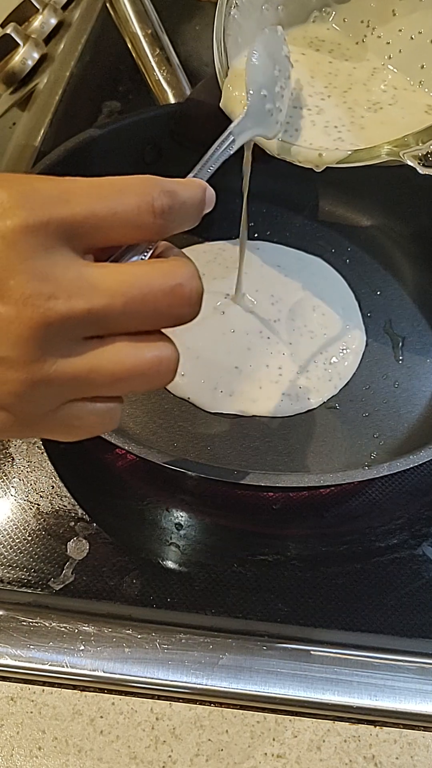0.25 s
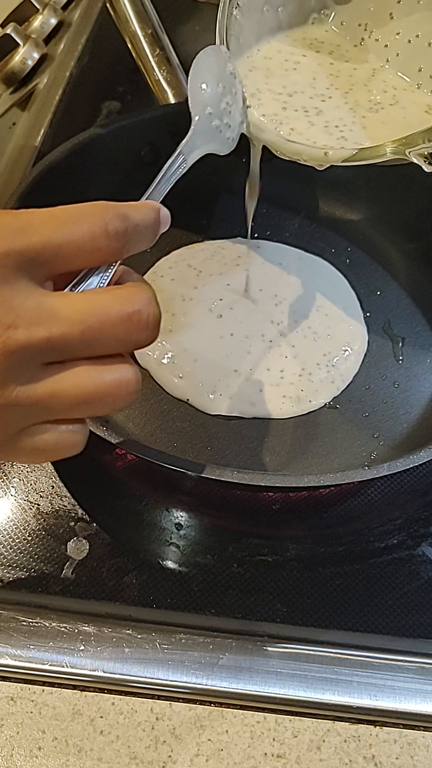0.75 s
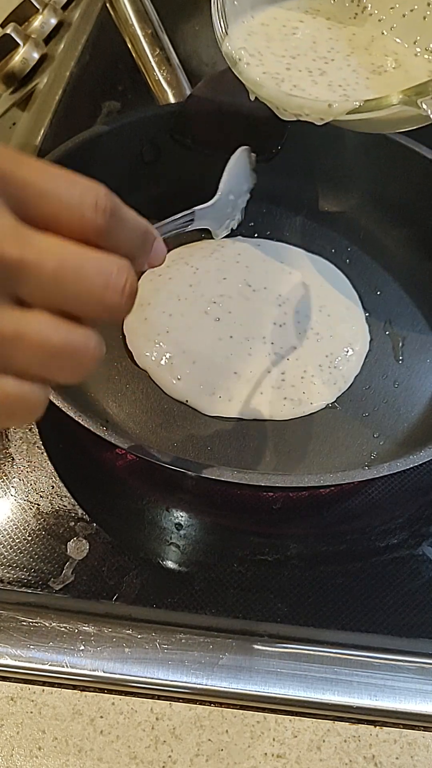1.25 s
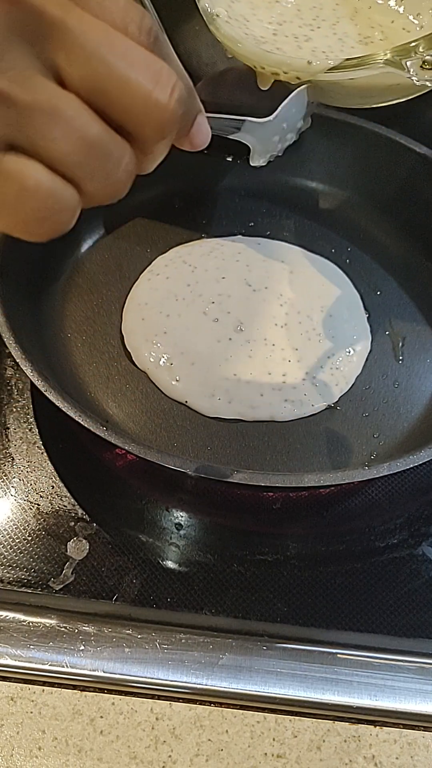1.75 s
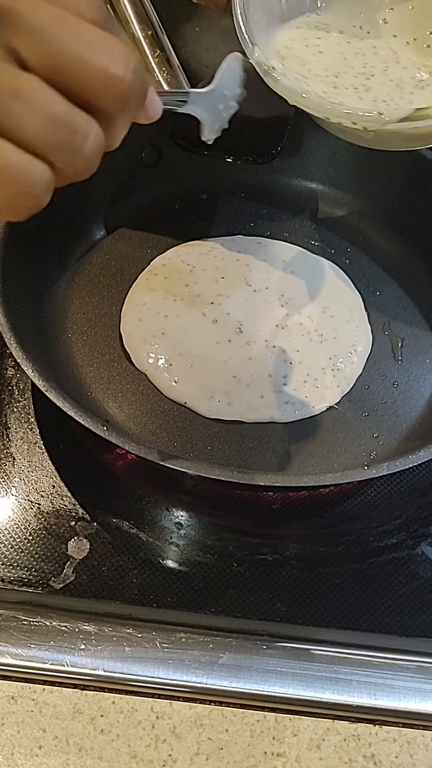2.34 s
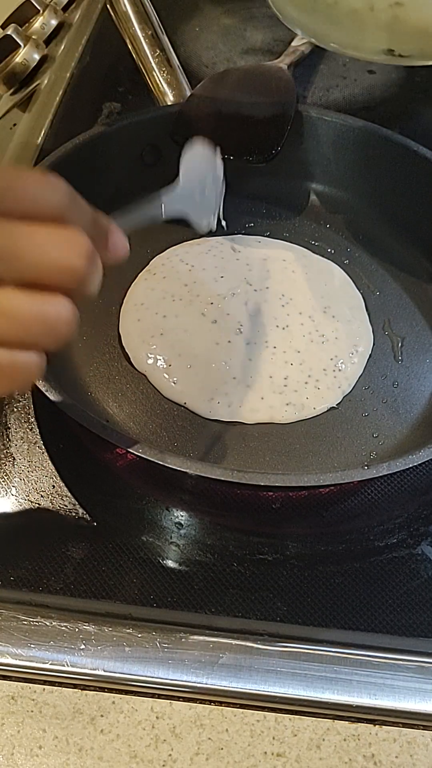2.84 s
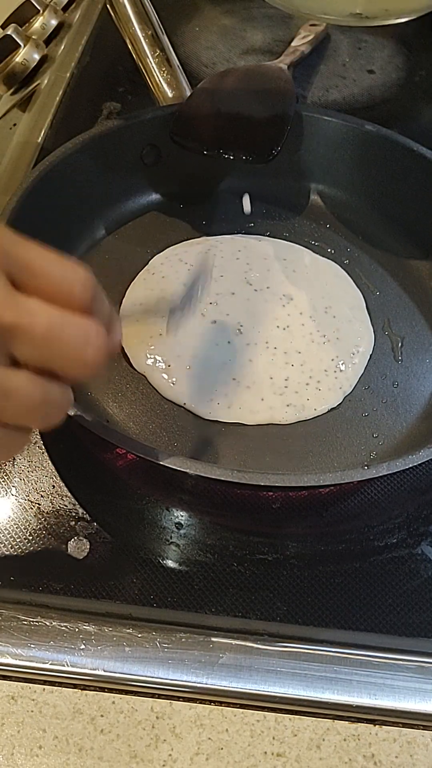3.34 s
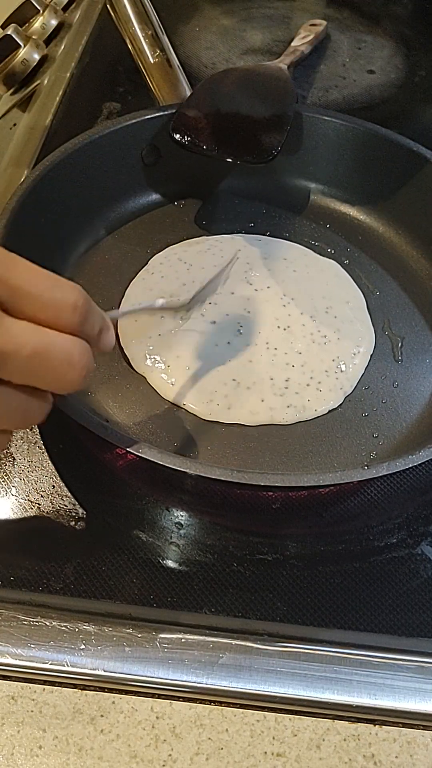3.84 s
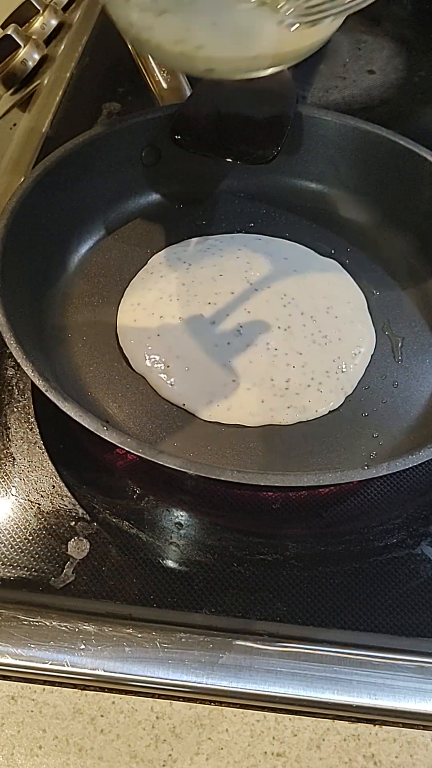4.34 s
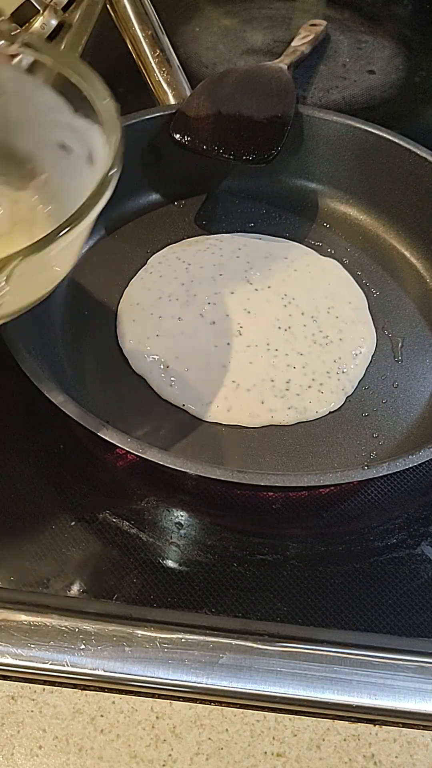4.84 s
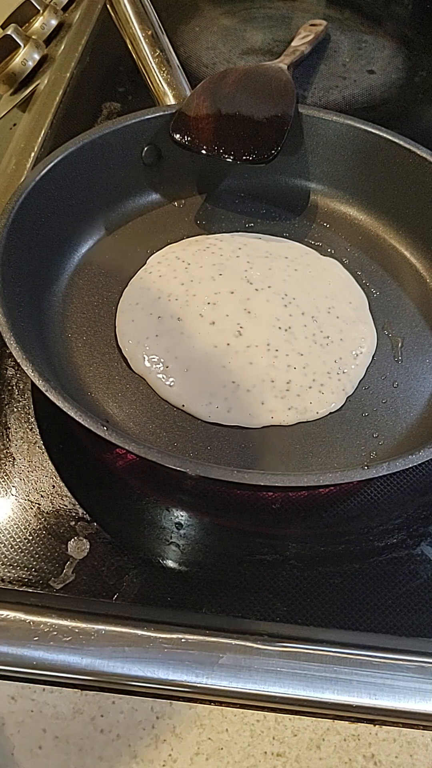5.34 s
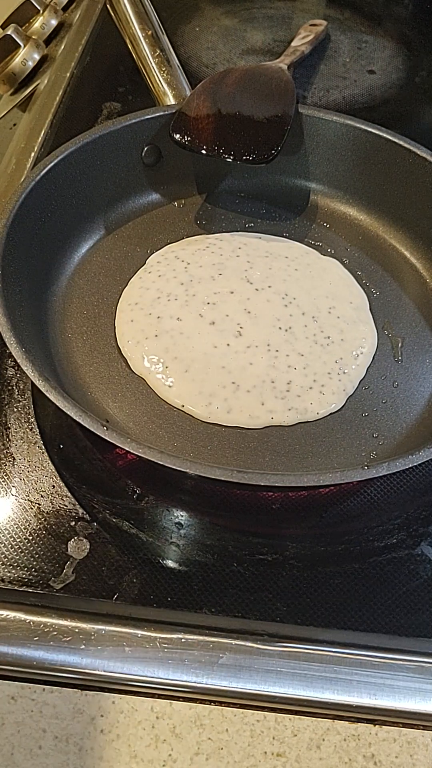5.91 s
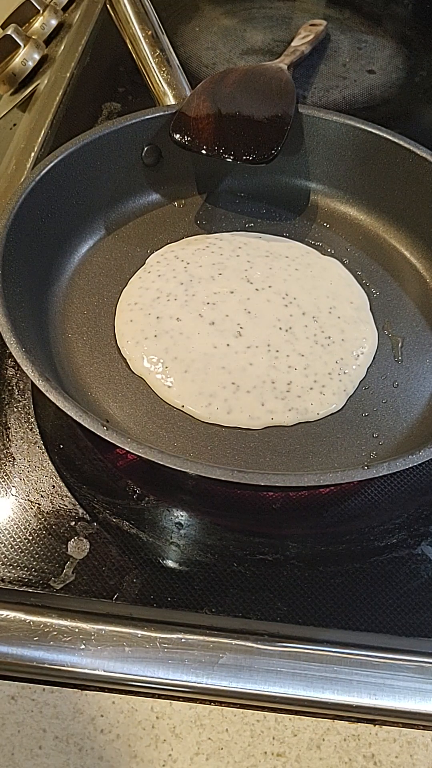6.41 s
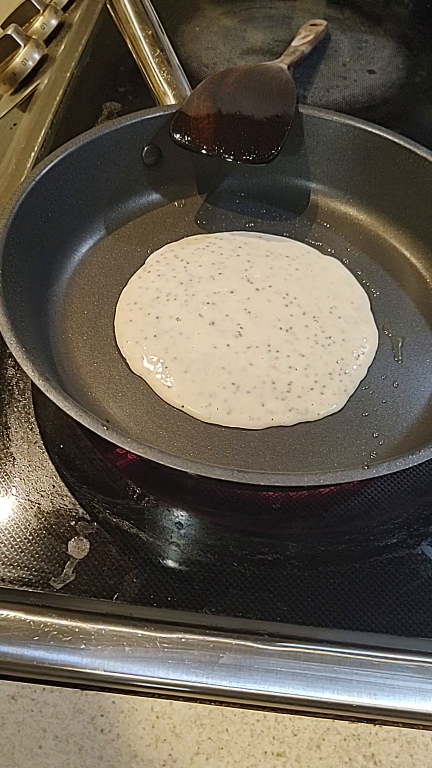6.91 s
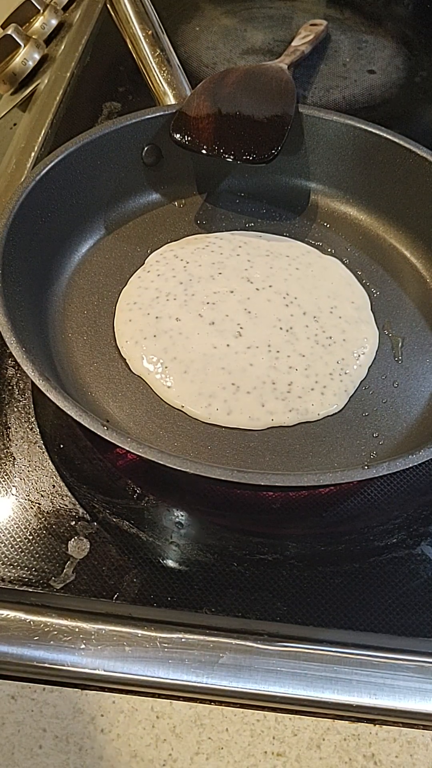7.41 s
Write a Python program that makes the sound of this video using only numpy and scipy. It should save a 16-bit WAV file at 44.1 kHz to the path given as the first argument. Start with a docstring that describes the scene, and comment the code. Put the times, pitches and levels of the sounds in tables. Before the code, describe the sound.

A small, lightly reverberant kitchen, captured close by a stereo phone, has a soft steady rush and faint wavering low hum. From 0 to 0.4 s a plastic spoon scrapes gritty strokes on a glass bowl at the left; a short sizzle bursts at 0.4 s. A double glassy knock comes at 0.7 s, then more scraping until 1.15 s with a barely audible squeak. Faint ticking and rustling follow at 1.5-1.8 s, a light tap at 2.1 s, a short rising squeak and scrape around 2.55 s, and a tight cluster of clinks at 2.7 s. Quiet holds until the spoon clunks into the bowl at 5.0 s; the bowl knocks down brightly at 5.3 s. At 6.9 s a wooden utensil bangs loudest, on the right, its woody bounces and low worktop thuds dwindling by about 7.2 s, leaving subdued room noise.

```python
"""A plastic spoon taps, scrapes and squeaks on the rim of a glass bowl of batter, left of a phone.
Faint rustles, ticks and a loud sizzle sound nearby; a wooden utensil bounces on the worktop to the right.
Knocks drive damped modes of spoon, glass, wood and worktop; tiny jerks drive the scrapes, gliding tones squeak.
Rustles and sizzle are coloured noise puffs; steady noise and wavering tones make the small kitchen's rush and hum.
The phone turns its gain down after loud peaks, such as the bang, and creeps back."""
import sys
import numpy as np
from scipy import signal
from scipy.fft import rfft, irfft, next_fast_len
from scipy.io import wavfile
from scipy.ndimage import uniform_filter1d, map_coordinates

SR = 44100
rng = np.random.default_rng(int(sys.argv[2]) if len(sys.argv) > 2 else 0)


def master(y):
    """Save y as 16-bit WAV."""
    cut = np.clip(np.atleast_2d(y).T, -1, 1)
    pcm = np.round(cut * 32767)  # scale
    wavfile.write(sys.argv[1], SR, pcm.astype(np.int16))


N = 338247

# the plastic spoon's dull modes, before each blow or stroke alters them:
# (frequency [Hz], level [dB], t60 [s])
SPOON = [(737, -10.5, 0.043), (920, -1.5, 0.1), (1198, 1.5, 0.1), (1436, -3, 0.034), (2024, -5, 0.042),
         (2504, -1, 0.029), (3078, -2, 0.029), (3930, -1.5, 0.035), (4460, -5, 0.087), (5040, -18, 0.11),
         (7290, -19.5, 0.006), (10040, -19, 0.006), (15900, -17, 0.0047)]
# the glass bowl's middle modes: (frequency [Hz], level [dB], t60 [s])
BOWL_MID = [(2720, 1.5, 0.0275), (2824, -1.5, 0.1)]
# bright modes of the bowl's rim, ringing free: (frequency [Hz], level [dB], t60 [s])
BOWL_RIM = [(4200, -7, 0.11), (4255, -1, 0.15), (6660, -27, 0.13)]
# left port over right for sounds at the bowl: (frequency [Hz], level [dB])
BOWL_SIDE = [(1400, 2.5), (2100, 5), (4250, 21.5), (10000, 23)]
# how much earlier the left port hears the bowl: (frequency [Hz], lead [ms])
BOWL_LEAD = [(800, .25), (1150, .4), (2100, .47)]


def amp(db):
    """Gain of a level in dB."""
    return 10 ** (np.asarray(db) / 20)


def unit(x):
    """x scaled to rms 1."""
    return x / np.sqrt(np.mean(x ** 2) + 1e-20)


def along(points, hz):
    """Read a curve of (frequency [Hz], value) points on a log frequency axis."""
    f, v = np.transpose(points)
    return np.interp(np.log(hz + 1), np.log(f + 1), v)


def filtered(x, response):
    """x times a complex response of frequency."""
    m = next_fast_len(x.shape[-1] + SR // 2)
    spectrum = rfft(x, m) * response(np.fft.rfftfreq(m, 1 / SR))
    return irfft(spectrum, m)[..., :x.shape[-1]]


def ports(x, side, lead_ms):
    """The phone's body shades one port; the left hears lead_ms (number or curve) earlier, or later if negative."""
    def response(hz):
        over = along(side, hz)
        lead = along(lead_ms, hz) if np.ndim(lead_ms) else np.full_like(hz, lead_ms)
        delay_s = np.maximum([-lead, lead], 0) / 1000
        shade_db = np.minimum([over, -over], 0)
        return amp(shade_db) * np.exp(-2j * np.pi * hz * delay_s)
    return filtered(x, response)


def kitchen(x, wet_db):
    """Room reverberation: a fresh noise tail for each port, each frequency dying at its own speed."""
    # the room's decay: (frequency [Hz], t60 [s])
    decay = [(100, 0.23), (700, 0.26), (5000, 0.32), (12000, 0.026)]
    noise = rng.standard_normal((2, SR * 3 // 5))
    hz, t, z = signal.stft(noise, SR, nperseg=256)
    fade_db = -60 * t / along(decay, hz)[:, None]
    tail = signal.istft(z * amp(fade_db), SR, nperseg=256)[1]
    # the tail starts 1/300 s after the direct sound
    tail = np.pad(tail / np.linalg.norm(tail[0]), ((0, 0), (SR // 300, 0)))
    return amp(wet_db) * signal.fftconvolve(x, tail, axes=1)


def ringing(modes):
    """Response of damped modes (frequency [Hz], level [dB], t60 [s]); neighbours swing in opposite phase."""
    hz, db, t60 = np.transpose(modes)[..., None]
    width = np.log(1000) / (np.pi * t60)  # resonance bandwidth in Hz
    sign = (-1) ** np.arange(len(hz))[:, None]
    size = sign * amp(db) * np.sqrt(width)

    def response(f):
        resonances = size * 1j * f / (hz * hz - f * f + 1j * f * width)
        return np.sum(resonances, axis=0) * f / (f + hz[0] / 2j)  # weak below the first mode
    return response


def loosened(loose, chatter, t):
    """Gripped or landing anew, a loose thing splits and shifts its modes; all get much the same push."""
    held = np.repeat(loose, 5, axis=0)
    held[:, 0] *= rng.normal(1, .065, len(held))
    held = held[np.argsort(held[:, 0])]
    held[:, 2] = np.minimum(held[:, 2], .045)  # longest t60 in s
    drive = np.abs(np.exp(-2j * np.pi * np.outer(held[:, 0], t)) @ chatter) / np.sqrt(len(t))
    held[:, 1] -= 5 + 15 * np.log10(drive + .6)
    return ringing(held)


def blow(chatter_ms, soft_ms, steady_db, crack_db, loose, steady, order):
    """A brief chatter of contacts cracks and rings; a soft one loses treble, a long one swells in."""
    crack_hz, crack_s = 892, 0.0047  # lower edge and fade of the crack
    t = np.arange(SR // 3) / SR
    u = t * 1000 / chatter_ms
    envelope = (1 - np.exp(-9 * u / chatter_ms)) * np.exp(-u)
    chatter = unit(envelope * rng.standard_normal(len(t)))
    loose_ring = loosened(loose, chatter, t)
    rings = [ringing(modes) for modes in steady]
    # one impulse at the hardest contact rings the steady bodies
    hardest = np.sqrt(len(t) / 2) * (np.arange(len(t)) == np.abs(chatter).argmax())
    crack = amp(crack_db) * unit(np.exp(-t / crack_s) * rng.standard_normal(len(t)))

    def soft(f):
        return 1 / (1 + 2j * np.pi * f * soft_ms / 1000) ** order

    def bodies(f):
        return sum(amp(db) * ring(f) for ring, db in zip(rings, steady_db))

    return (filtered(chatter, lambda f: loose_ring(f) * soft(f))
            + filtered(hardest, lambda f: bodies(f) * soft(f))
            + filtered(crack, lambda f: (f / (f + crack_hz / 1j)) ** 2 * soft(f)))


def blows(events, loose, steady, side, lead_ms, wet_db, order):
    """Set each blow at its time and level, heard directly at the ports and through the kitchen."""
    out = np.zeros((2, N + 2 * SR))
    for s, db, chatter_ms, soft_ms, *steady_db, crack_db in events:
        ring = blow(chatter_ms, soft_ms, steady_db, crack_db, loose, steady, order)
        # scale by the sine peak equal to the strongest 200 samples
        strongest = np.sqrt(2 * uniform_filter1d(ring ** 2, size=200).max())
        near = ports(ring * amp(db) / strongest, side, lead_ms)
        far = kitchen(near, wet_db)
        start = round(s * SR)
        out[:, start:][:, :near.shape[1]] += near
        out[:, start:][:, :far.shape[1]] += far
    return out[:, :N]


def air():
    """Steady noise whose left-right likeness varies with frequency, with wavering appliance tones."""
    # colour of the kitchen's steady rush: (frequency [Hz], relative level [dB per Hz])
    rush_colour = [(35, -59.5), (50, -17.5), (200, -11.5), (280, -7), (420, -10.5), (510, -8.5),
                   (800, -13.5), (1340, -21), (2500, -26), (3450, -20), (4250, -27.5), (6000, -43),
                   (7600, -27.5), (8100, -35.5), (11200, -45.5), (15700, -22)]
    # left-right correlation of the rush before shading: (frequency [Hz], likeness [0 to 1])
    likeness = [(60, 0.34), (150, 0.61), (400, 0.25), (700, 0.96), (1000, 0.043)]
    # appliance tones before shading: (frequency [Hz], sine peak level [dB], rms pitch waver [Hz])
    hum = [(56.96, -84, 5.4), (119.9, -71.5, 0.34), (235.5, -79, 3.3), (376.5, -77.5, 1), (502, -77, 22)]
    # left port over right: (frequency [Hz], level [dB])
    air_side = [(60, 0), (250, -0.5), (450, 1.5), (3000, 5.5), (6000, 7.5), (8000, 24), (10000, 8),
                (15000, 3)]

    def mid_and_side(hz):
        turn = np.arccos(np.clip(along(likeness, hz), 0, 1)) / 2
        return amp(along(rush_colour, hz)) * [np.cos(turn), np.sin(turn)]

    mid, side = filtered(rng.standard_normal((2, N)), mid_and_side)
    rush = amp(-68) * unit(np.array([mid + side, mid - side]))
    t = np.arange(N) / SR
    tones = 0
    for hz, db, waver in hum:
        drift = unit(map_coordinates(rng.standard_normal(80), [t * 9]))  # 9 random points a second
        tones = tones + amp(db) * np.sin(2 * np.pi * np.cumsum(hz + waver * drift) / SR)
    return ports(rush + tones, air_side, 0.25)


def puff(s, db, rise, t60, colour):
    """A rustle, tick or sizzle as coloured noise that starts at s, rises and dies away exponentially."""
    t = np.maximum(np.arange(N) / SR - s, 0)
    noise = unit(filtered(rng.standard_normal((2, N)), colour))
    envelope = amp(db - 60 * t / t60) * (1 - np.exp(-t / rise))
    return ports(noise * envelope, BOWL_SIDE, 0)


def rustles_and_sizzle():
    """Faint rustles, ticks and a sizzle: puffs in bands of noise, and one loud burst of richer colour."""
    # faint rustles and ticks, levels before rise and fade:
    # (time [s], level [dB], rise [s], t60 [s], centre [Hz], width [octaves])
    small_sounds = [(1.519, -53.5, 0.00049, 0.036, 9300, 5), (1.686, -51.5, 0.082, 0.35, 3730, 0.92),
                    (4.858, -63, 0.0081, 1, 2580, 0.68), (5.081, -65, 0.0019, 0.28, 9650, 0.29),
                    (6.099, -66.5, 0.00088, 0.075, 12050, 1)]
    # the loud sizzle's colour: (frequency [Hz], relative level [dB per Hz])
    sizzle_colour = [(130, -45), (215, 0), (310, -36), (847, 0), (1160, -16), (1350, -5.5), (2390, -15.5),
                     (3280, -11), (7300, -12), (8100, 5), (9300, -8), (15700, -21.5)]

    def band(hz, octaves):
        return lambda f: 1 / (1 + (np.log2((f + 1) / hz) / octaves) ** 2) ** 1.24

    small = sum(puff(s, db, rise, t60, band(hz, octaves))
                for s, db, rise, t60, hz, octaves in small_sounds)
    sizzle = puff(.389, -37.5, rise=0.0041, t60=0.29, colour=lambda f: amp(along(sizzle_colour, f)))
    return small + sizzle


def utensil():
    """The wooden utensil lands, rattles and settles; each impact rings its modes and the worktop's."""
    # the utensil's loose modes, before each landing alters them:
    # (frequency [Hz], level [dB], t60 [s])
    wood = [(544, 3.5, 0.021), (737, 7, 0.03), (982, 5.5, 0.033), (1217, 1.5, 0.046), (1518, 5, 0.022),
            (1933, 9, 0.01), (2430, 1.5, 0.059), (2957, 3.5, 0.038), (3675, -1, 0.11), (4660, -10, 0.017)]
    # its clearest mode, of the same pitch at every landing, level at the first:
    # (frequency [Hz], level [dB], t60 [s])
    handle = [(654.4, 1, 0.091)]
    # the worktop's modes: (frequency [Hz], level [dB], t60 [s])
    worktop = [(138, 7, 0.024), (207.8, 6, 0.051), (278, 4.5, 0.15), (430, -7, 0.068)]
    # impacts: (time [s], level [dB], softness [ms], worktop against the utensil [dB])
    bounces = [(6.918, -3.5, 0.039, -4), (6.925, -10, 0.035, -20), (6.949, -11.5, 0.14, -3.5),
               (6.960, -13, 0.14, -24.5), (6.978, -11.5, 0.063, -5.5), (7.001, -23, 0.071, -3.5),
               (7.061, -12, 0.15, -9), (7.109, -31.5, 0.096, -17), (7.188, -25.5, 0.17, -4)]
    # left port over right: (frequency [Hz], level [dB])
    wood_side = [(100, -17), (250, -17), (450, -6), (1000, -1.5), (2200, 9), (4200, 12.5), (10000, 16)]
    chatter_ms, crack_db = 1.3, -55.5
    handle_dulls_db_per_s = 39.5  # later landings stir the clearest mode less
    landings = []
    for s, db, soft_ms, top_db in bounces:
        handle_db = -handle_dulls_db_per_s * (s - bounces[0][0])
        landings.append((s, db, chatter_ms, soft_ms, top_db, handle_db, crack_db))
    thuds = blows(landings, wood, [worktop, handle], wood_side, lead_ms=-.23, wet_db=-8.5, order=3)
    # the phone picks up little of the thuds below 69.5 Hz
    return filtered(thuds, lambda f: (f / (f + 69.5 / 1j)) ** 2)


def squeak():
    """The wet edge sings on the glass: rough notes that swell, rise a little and fade."""
    # notes: (start [s], length [s], first pitch [Hz], peak before roughness [dB])
    sung = [(1.048, 0.07, 2600, -65), (2.394, 0.063, 812, -66.5), (2.528, 0.102, 907.6, -48.5)]
    rise_hz_per_s = 294
    t = np.arange(N) / SR
    # the level wavers at random, with 140 points a second
    rough = amp(5 * map_coordinates(rng.standard_normal(N * 140 // SR + 4), [t * 140]))
    s, length, hz, db = np.transpose(sung)[..., None]
    since = np.clip(t - s, 0, length)
    swell = amp(db) * np.abs(np.sin(np.pi * since / length)) ** 0.8
    notes = swell * np.sin(2 * np.pi * since * (hz + rise_hz_per_s * since / 2))
    near = ports(rough * notes.sum(axis=0), BOWL_SIDE, BOWL_LEAD)
    return near + kitchen(near, -1.0)[:, :N]


def scraping():
    """The spoon's edge catches and slips in clumped tiny jerks; each stroke bends it and shifts its modes."""
    # strokes, levels before the push fades: (time [s], low ring [dB], fade [s],
    # high ring against the low [dB], rim ring against the low [dB])
    strokes = [(.005, -50, 0.049, -6.5, -8.5), (0.073, -46, 0.023, -19, -10), (0.139, -50, 0.042, -13, -14),
               (0.156, -56.5, 0.073, -10.5, -5.5), (0.32, -52, 0.031, -4.5, -12),
               (0.357, -64.5, 0.0092, -17, -3), (0.795, -48.5, 0.059, -9, -16),
               (0.853, -56.5, 0.082, -0.5, -7), (0.926, -44, 0.013, -9, -8),
               (0.973, -55.5, 0.0091, -1, -23), (1.017, -55, 0.023, -6, -40), (1.051, -52, 0.025, -9, -33),
               (1.077, -49.5, 0.035, -10, -38), (1.109, -45.5, 0.011, -2, -11),
               (2.541, -61.5, 0.095, -0.5, -6), (2.591, -49.5, 0.011, -7, -6), (2.656, -65, 0.045, 13.5, 3)]
    rise_share = 0.046  # rise time as a share of the fade
    pressed_rim = BOWL_RIM * np.array([1, 1, 0.19])  # the edge damps the rim to this share of its t60
    first_pass_s, first_pass_db = .4, 4.5  # until then the upper belly modes ring louder
    last_pass_s, last_pass_db = 2, 12  # from then the edge scrapes bare glass: treble modes ring louder
    out, t = np.zeros(N + SR), np.arange(SR // 2) / SR
    for s, db, fade, high_db, rim_db in strokes:
        clumps = map_coordinates(rng.standard_normal(70), [t * 120])
        sparse = rng.random(len(t)) < 2000 / SR  # about 2000 jerks a second
        jerks = sparse * rng.standard_normal(len(t)) * amp(3 * clumps)
        push = (1 - np.exp(-t / (rise_share * fade))) * np.exp(-(t / fade) ** 2 / 2)
        bent = np.array(SPOON)
        bent[:, 0] *= rng.normal(1, .035, len(bent))
        bent[2:4, 1] += first_pass_db * (s < first_pass_s)
        bent[-3:, 1] += last_pass_db * (s > last_pass_s)
        high = sorted([*map(tuple, bent[4:]), *BOWL_MID])
        start = round(s * SR)
        for level, modes in ((db, bent[:4]), (db + high_db, high), (db + rim_db, pressed_rim)):
            ring = ringing(modes)
            steady_level = np.std(filtered(jerks, ring))
            out[start:][:len(t)] += amp(level) * filtered(jerks * push, ring) / steady_level
    near = ports(out[:N], BOWL_SIDE, BOWL_LEAD)
    return near + kitchen(near, -16.5)[:, :N]


def taps():
    """The spoon knocks on the glass: its dull modes sound with the bowl's deep, middle and bright rings."""
    # knocks: (time [s], level [dB], softness [ms], change of the spoon's lowest modes [dB],
    # deep ring [Hz], share of the rim's t60 left by the grip,
    # deep, middle and bright ring against the spoon [dB each], crack [dB])
    knocks = [(.707, -27, 0.034, 11, 1010, 0.2, -1.5, 2.5, 9.5, -83),
              (.724, -37, 0.055, -12, 1090, .6, 2, 13, -9, -68),
              (2.111, -42.5, 0.042, 4, 1114, 0.34, -2.5, -6, -10, -72),
              (2.686, -38.5, 0.0063, 10, 1000, 0.38, 2, 1, 2, -63),
              (2.697, -28.5, 0.0096, 16.5, 1070, 0.28, 4, -19, 0.5, -65),
              (2.715, -25.5, 0.0043, 13, 1103, 0.2, 9.5, 2.5, 4.5, -53.5),
              (2.738, -41.5, 0.82, 1, 1100, .5, -12, -17, -30, -53),
              (4.983, -18, 0.013, 6.5, 1049, .5, 1.5, -30, -16.5, -46.5),
              (5.284, -25.5, 0.0059, -11, 1046, 0.58, 1, -7, 9.5, -66)]
    # the deep ring once the bowl stands on the worktop: (frequency [Hz], level [dB], t60 [s])
    resting = [(1046, 0, .07), (1421, -12, .2)]
    chatter_ms = 1.81
    deep_t60_s, twin_ratio = 0.13, 0.91  # held, the deep ring is a close pair; grip and batter shift it
    inside_s, rests_s = 4, 5.2  # from then the spoon lies in the bowl; the bowl stands on the worktop
    lowest_hz, belly_hz, tip_hz = 1000, 1700, 3500  # bounds of the spoon's mode groups

    def spoon_change_db(hz, s, low_db):
        if hz < lowest_hz:
            return low_db
        if s <= inside_s:
            return 0
        belly_db = 10.5 * (hz < belly_hz)
        tip_db = 4 * (hz > tip_hz and s < rests_s)  # only as the spoon drops in
        return belly_db + tip_db

    out = 0
    for s, db, soft_ms, low_db, deep_hz, left, *ring_and_crack_db in knocks:
        spoon = [(hz, level + spoon_change_db(hz, s, low_db), t60) for hz, level, t60 in SPOON]
        deep = [(deep_hz, 0, deep_t60_s), (deep_hz * twin_ratio, 0, deep_t60_s)]
        if s > rests_s:
            deep = resting
        rim = BOWL_RIM * np.array([1, 1, left])
        event = (s, db, chatter_ms, soft_ms, *ring_and_crack_db)
        out = out + blows([event], spoon, [deep, BOWL_MID, rim], BOWL_SIDE, BOWL_LEAD,
                          wet_db=-14.0, order=2)
    return out


def scene():
    """All sources summed at the phone's two ports."""
    return air() + rustles_and_sizzle() + utensil() + squeak() + scraping() + taps()


def record(dry):
    """Gain control ducks after loud peaks and creeps back; the very tops round off and the band is limited."""
    peak_db = 20 * np.log10(np.abs(dry).max(axis=0) + 1e-9)
    over_db = np.maximum(peak_db + 14, 0) * 0.31  # duck by this share of what exceeds -14 dB
    creep_db = 1.7 * np.arange(N) / SR  # recovery of 1.7 dB per second
    duck_db = np.maximum(np.maximum.accumulate(over_db + creep_db * (over_db > 0)) - creep_db, 0)
    duck_db = uniform_filter1d(duck_db, size=441, origin=220)  # eased over the last 10 ms
    ducked = dry * amp(-duck_db)
    rounded = .92 * ducked / (.92 ** 8 + ducked ** 8) ** (1 / 8)
    return filtered(rounded, lambda hz: hz < 15750)


dry = scene()
out = record(dry)
master(out)
```